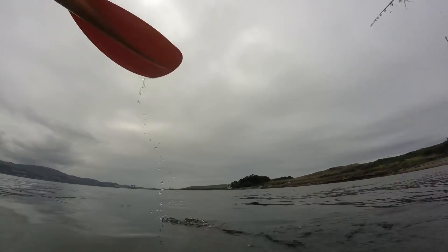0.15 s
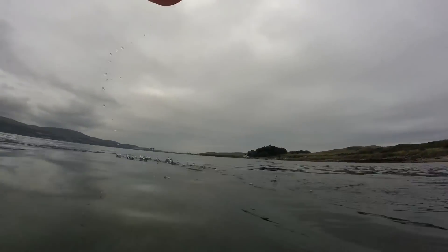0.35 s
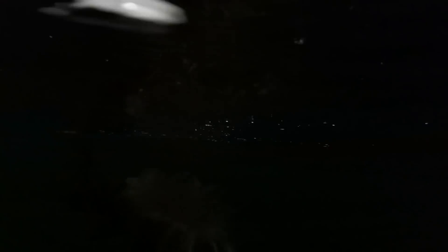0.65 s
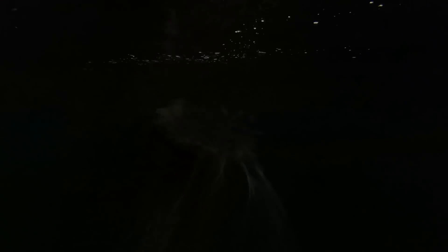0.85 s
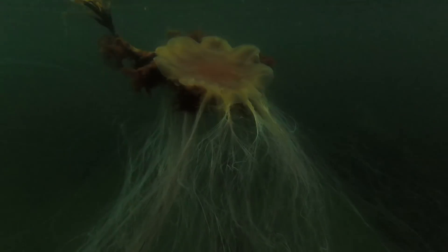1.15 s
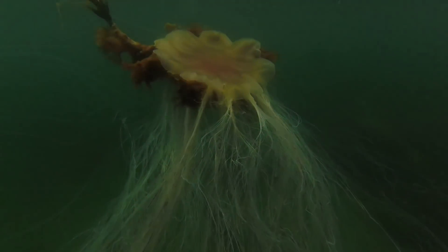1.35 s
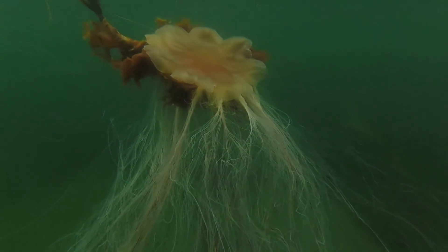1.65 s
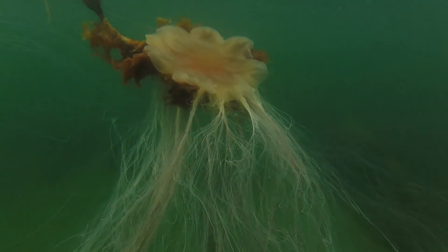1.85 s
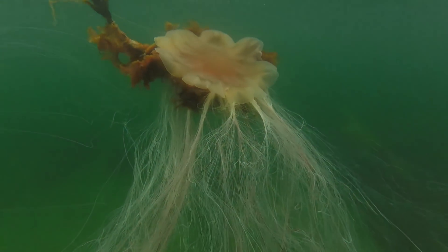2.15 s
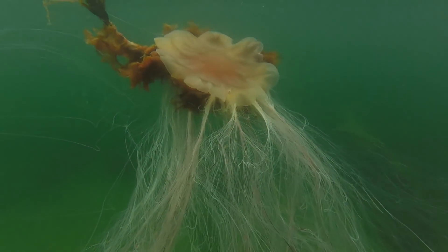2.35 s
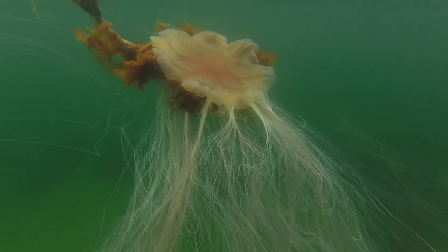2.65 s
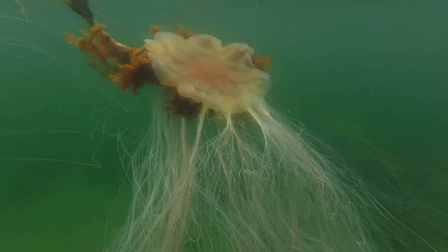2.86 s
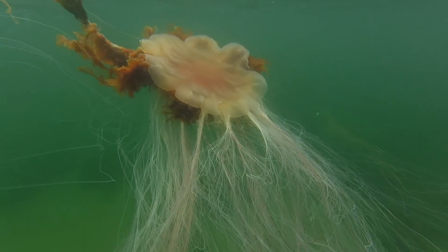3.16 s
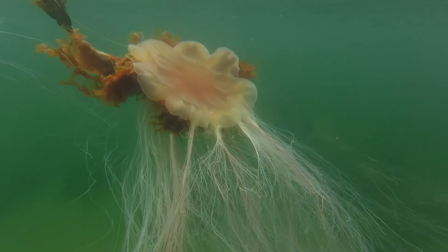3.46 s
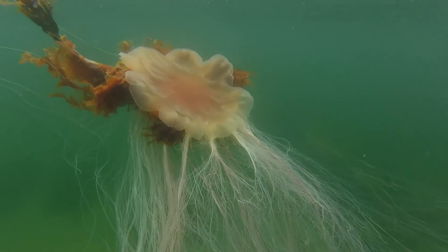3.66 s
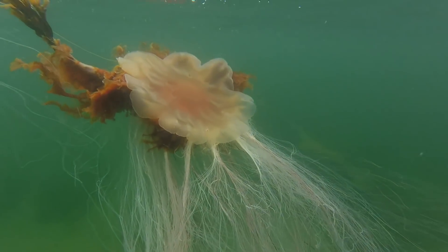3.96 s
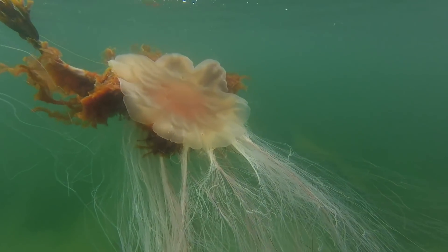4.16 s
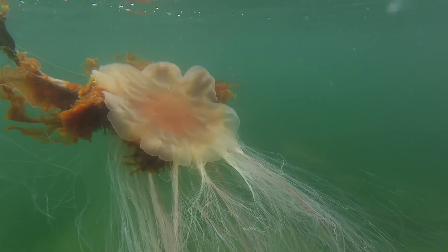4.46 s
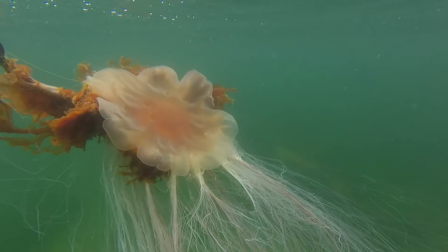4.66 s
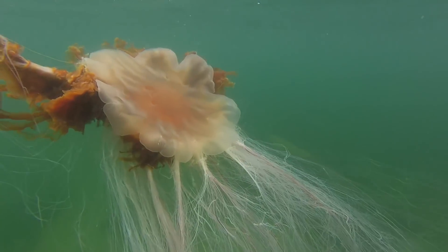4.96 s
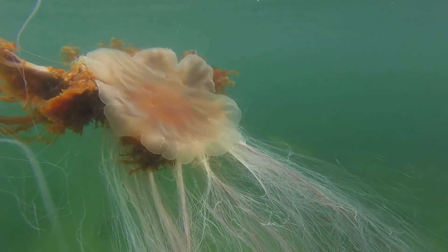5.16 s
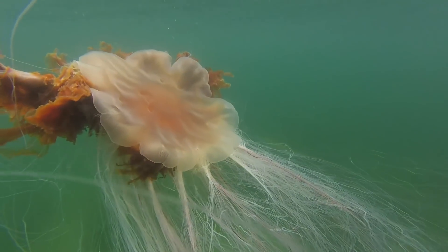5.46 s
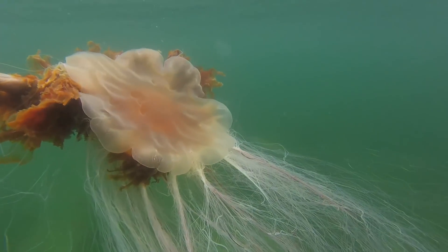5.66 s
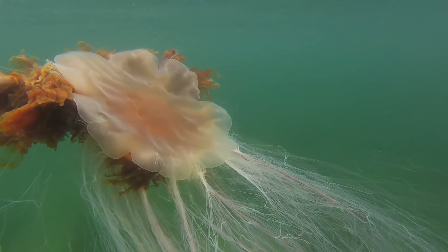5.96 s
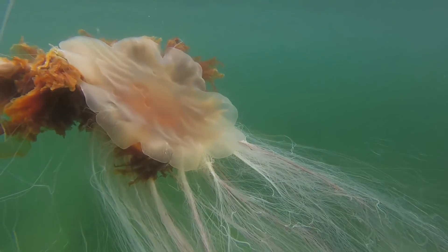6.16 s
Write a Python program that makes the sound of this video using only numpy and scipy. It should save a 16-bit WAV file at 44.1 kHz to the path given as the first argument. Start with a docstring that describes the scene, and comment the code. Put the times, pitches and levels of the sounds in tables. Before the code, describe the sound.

A quick flurry of trickling water, hollow slaps and ringing bubbles, with low wind rumble, surrounds a microphone in a waterproof case as it dips into an estuary. A short surge follows, then the steady underwater sound of a distant boat: a droning engine and a rushing, hissing propeller. The case takes a knock soon after the plunge and a louder one past the middle, with faint ticks and soft low bumps behind.

```python
"""A distant boat's propeller wash and engine, ringing through a small camera's waterproof case.
The case is first lowered from a kayak into an estuary: wind buffets it, water trickles and drips,
then slaps and bubbles ring as it goes under. From there on, cavitation noise and wavering engine
tones fill the water, with a few knocks and faint far snaps.
Loud knocks push the automatic gain down and it creeps back."""
import sys
import numpy as np
from scipy import signal
from scipy.fft import rfft, irfft
from scipy.io import wavfile
from scipy.ndimage import uniform_filter1d

SR = 44100
rng = np.random.default_rng(int(sys.argv[2]) if len(sys.argv) > 2 else 0)


def store_pcm(level_fs):
    """Save levels as 16-bit WAV."""
    pcm = np.round(np.clip(level_fs, -1, 1) * 32767).astype(np.int16)
    wavfile.write(sys.argv[1], SR, np.atleast_2d(pcm).T)


N = 278712
TIME_S = np.arange(N) / SR


def amp(db):
    """dB to gain."""
    return 10 ** (np.asarray(db) / 20)


def unit_rms(x):
    """Scale to rms 1."""
    return x / np.sqrt(np.mean(x ** 2) + 1e-20)


def gain_curve(points):
    """Per-sample gain through (time_s, level_db) points."""
    return amp(np.interp(TIME_S, *np.transpose(points)))


def drift(rate_hz):
    """Smooth random wander, rms 1."""
    hop, warmup = 100, 1000
    pole = np.exp(-2 * np.pi * rate_hz * hop / SR)
    noise = rng.standard_normal(N // hop + warmup + 2)
    slow = signal.lfilter([1], [1, -2 * pole, pole * pole], noise)[warmup:]
    return np.interp(np.arange(N) / hop, np.arange(len(slow)), unit_rms(slow))


def coloured(spectrum):
    """Noise shaped by (freq_hz, density_db) points, rms 1."""
    hz, db = np.transpose(spectrum)
    bins_hz = np.arange(1, N // 2 + 2) * SR / N
    shape = amp(np.interp(np.log(bins_hz), np.log(hz), db))
    return unit_rms(irfft(rfft(rng.standard_normal(N)) * shape, N))


def peak(x, hz, width_hz, gain_db):
    """Lift or cut one resonance."""
    a, w, g = np.pi * width_hz / SR, 2 * np.pi * hz / SR, amp(gain_db / 2)
    return signal.lfilter([1 + a * g, -2 * np.cos(w), 1 - a * g],
                          [1 + a / g, -2 * np.cos(w), 1 - a / g], x)


def butter(order, hz, kind="low"):
    """Butterworth filter sections."""
    return signal.butter(order, hz, kind, fs=SR, output="sos")


def add(out, start_s, sound):
    """Mix in a short sound."""
    at = round(start_s * SR)
    out[at:at + len(sound)] += sound[:N - at]


# far snaps: start_s, level_db
SNAPS = [(.9655, -32.5), (2.1463, -41.5), (3.455, -45.5), (4.997, -36), (5.8635, -43.5)]


def snaps():
    """Faint bright ticks with no ring."""
    out, age = np.zeros(N), np.arange(400) / SR / 0.0017
    band = butter(2, [2600, 7500], "band")
    for start_s, level_db in SNAPS:
        burst = rng.standard_normal(len(age)) * age * np.exp(1 - 2.2 * age)
        add(out, start_s, amp(level_db) * signal.sosfilt(band, burst))
    return out


# wind, then swirl, before the fade: time_s, level_db
BUFFET = [(0, -21), (.07, -35.5), (.66, -33.5), (.82, -24), (.865, -22.5), (.895, -8.5), (.91, -22)]


def buffet():
    """Wind, then stirred water, rumbles on the ports and settles."""
    rumble = coloured([(12, -17.5), (25, 2.5), (60, -7.0), (120, -21), (400, -30), (2000, -84.5)])
    fade = np.clip((1.35 - TIME_S) / 0.52, 0, 1)
    return fade * gain_curve(BUFFET) * rumble


# trickle heard in air: freq_hz, density_db
TRICKLE_SPECTRUM = [(180, -33.5), (300, -13.5), (365, -41.5), (459, -21), (714, -21), (898, -12.5),
                    (1760, -6), (6510, -37), (9500, -41), (13000, -62)]
# dry case resonances: centre_hz, width_hz, gain_db
DRY_RESONANCES = [(870, 89, 5), (1330, 200, 6), (1750, 250, 4.5), (2100, 160, -6), (2450, 270, 8.5),
                  (4200, 300, 1), (6000, 650, 5.5)]
# water passing the dry case: peak_s, rise_s, fall_s, trickle_lift_db, boom_lift_db
SWISHES = [(.085, 0.038, 0.011, 8.5, 4.5), (.29, .06, 0.075, 13.5, 10.5), (.46, 0.085, 0.16, 5.5, 6.5),
           (.86, .1, 0.07, 13, 19.5)]


def surface(trickle_db=-41, boom_db=-35.5, under_s=.9, close_s=.02):
    """Water trickles and the hand makes the dry case boom; both stop as it goes under."""
    swells = [np.clip(np.minimum(1 + (TIME_S - peak_s) / rise_s, 1 - (TIME_S - peak_s) / fall_s), 0, 1)
              for peak_s, rise_s, fall_s, *_ in SWISHES]
    trickle_lift_db, boom_lift_db = np.transpose(SWISHES)[3:] @ swells
    boom = coloured([(60, -34), (140, -2.5), (200, -2.0), (260, -24.5), (2000, -77.5)])
    boom = amp(boom_db + boom_lift_db) * unit_rms(peak(boom, hz=183, width_hz=35, gain_db=8))
    trickle = coloured(TRICKLE_SPECTRUM) * amp(0.95 * drift(60))
    for resonance in DRY_RESONANCES:
        trickle = peak(trickle, *resonance)
    trickle = amp(trickle_db + trickle_lift_db) * unit_rms(trickle)
    in_air = np.clip((under_s - TIME_S) / close_s + .5, 0, 1)
    return in_air * (boom + trickle)


def spatter(from_s=.43, to_s=.81, drops_per_s=260, level_db=-35.5, t60_cycles=14):
    """Tiny random drops around the plunge, each ringing briefly at one of twelve pitches."""
    born = (rng.random(N) < drops_per_s / SR) & (TIME_S > from_s) & (TIME_S < to_s)
    sizes = born * amp(4.5 * np.minimum(rng.exponential(1, N), 4)) * rng.choice([-1, 1], N)
    pitch_index, out = rng.integers(0, 12, N), np.zeros(N)
    for k, pitch_hz in enumerate(np.geomspace(900, 3600, num=12)):
        pole, w = amp(-60 * pitch_hz / (t60_cycles * SR)), 2 * np.pi * pitch_hz / SR
        drops = (sizes * (pitch_index == k))[:SR]
        out[:SR] += signal.lfilter([0, np.sin(w)], [1, -2 * pole * np.cos(w), pole * pole], drops)
    return amp(level_db) * signal.sosfilt(butter(2, 5000), out)


# pressure bumps: start_s, level_db, pitch_hz
BUMPS = [(0.296, -15.5, 31), (.335, -22.5, 90.6), (0.505, -15.5, 300), (0.5967, -8.5, 250),
         (0.698, -17, 202), (0.752, -7, 251), (0.782, -7, 252), (0.862, -0.5, 104), (1.156, -17.5, 252),
         (3.7807, 4, 155), (5.651, -21, 93.6), (5.871, -22, 102), (5.886, -21.5, 97), (5.909, -20.5, 90.5)]


def bumps():
    """Moving water gives soft, heavily damped low swings of pressure."""
    out, t = np.zeros(N), np.arange(6000) / SR
    for start_s, level_db, pitch_hz in BUMPS:
        cycles = pitch_hz * t
        envelope = (1 - np.exp(-9 * cycles)) * np.exp(-1.4 * cycles)
        add(out, start_s, -amp(level_db) * envelope * np.sin(2 * np.pi * cycles))
    return out


# struck case modes: pitch_hz, level_db, t60_s
CASE_MODES = [(632, -14, .035), (1455, -12, .02), (1700, -12, .015), (1943, -5, .02), (2412, -2, .013),
              (2720, -11, .013), (3106, -12, .012), (4050, -12, .008)]


def case_ring(t, spread_db=0.83):
    """The struck case rings in its modes, in a slightly different balance each time."""
    return sum(amp(level_db + rng.normal(0, spread_db) - 60 * t / t60_s) * np.sin(2 * np.pi * hz * t)
               for hz, level_db, t60_s in CASE_MODES)


# slaps, bubbles, knocks: start_s, bubble_db, pitch_hz, t60_s, case_db, crack_db
HITS = [(0.3873, -19, 1700, .011, -28, -18.5), (0.3938, -19, 1830, .017, -33.5, -28),
        (0.4043, 7, 1677, .012, -14, -23.5), (0.4324, -18.5, 2450, .013, -41, -45),
        (0.4683, -18.5, 1440, .013, -29, -34), (0.4913, -12, 2470, .021, -22.5, -11),
        (0.4967, -1, 2510, .019, -5, 0.5), (0.5027, -9, 1430, .027, -25.5, -28),
        (0.5127, -11, 2340, .015, -20, -47), (0.5177, -6, 1610, .0054, -16, -46.5),
        (0.528, -1, 2720, .025, -16, -34), (0.5364, -2, 4024, .024, -17, -25),
        (0.5378, -6.5, 1620, .029, -39, -52), (0.5433, -7, 2930, .014, -14.5, -34.5),
        (0.5473, -22.5, 3890, .01, -21.5, -33), (0.5665, -34, 2030, .012, -36, -31),
        (0.5911, -10, 1600, .013, -13.5, -8.5), (0.597, 11.5, 1766, .011, -6, -25),
        (0.5974, -1, 779, .045, -45, -50.5), (0.6096, -11, 2310, .021, -26.5, -31),
        (0.6251, 5, 2550, .014, -5, -39), (0.6323, -11.5, 940, .024, -23, -32),
        (0.6407, -12, 2690, .015, -21, -13.5), (0.684, -30, 6000, .012, -33.5, -24),
        (0.6884, -11, 6050, .0079, -6, -9), (0.697, -11, 1220, .015, 0.5, -28),
        (0.7015, -7, 2450, .013, -21, -12), (0.713, -23, 1890, .014, -24, -12),
        (0.7453, -11, 2540, .0081, -25, -7.5), (0.7522, 18.5, 2260, .0091, 4, -11.5),
        (0.7588, -0.5, 2180, .013, -19, -41.5), (0.771, -20.5, 710, .013, -30.5, -29),
        (0.7796, 7, 4020, .013, 0, -5.5), (0.7831, 19.5, 2120, .0093, 11, 19.5),
        (0.7973, -8.5, 2440, .013, -22.5, -19.5), (0.8037, -9.5, 2130, .013, -22, -12.5),
        (0.8468, -1, 2390, .013, -2.5, -48), (1.1555, 17.5, 2120, .0043, 12, 4.5),
        (3.7808, 14, 1045, 0.0087, 13, -7.5), (3.7808, 10, 607, .03, -38, -44)]


def hits(last_spray_s=.9, slap_contact_s=.0021, knock_contact_s=.0018, spray_vs_bubble_db=1):
    """A short push rings a bubble and the case, with a crack on top; under water there is no spray."""
    out, t = np.zeros(N), np.arange(4000) / SR
    crack_band, wobble_band = butter(2, [4600, 7800], "band"), butter(4, 500)
    for start_s, bubble_db, pitch_hz, t60_s, case_db, crack_db in HITS:
        wobble_noise, crack_noise, spray_noise = rng.standard_normal((3, len(t)))
        splashing = start_s < last_spray_s
        age = t / (slap_contact_s if splashing else knock_contact_s)
        push = 1.444 * age * np.exp(1 - 1.795 * age)
        depth_db = splashing * 0.0021 * min(pitch_hz, 2500)   # small bubbles wobble most
        wobble_db = depth_db * unit_rms(signal.sosfilt(wobble_band, wobble_noise))
        envelope = (1 - np.exp(-(1.7 * age) ** 2)) * amp(wobble_db - 60 * t / t60_s)
        bubble = envelope / envelope.max() * np.sin(2 * np.pi * pitch_hz * t * (1 + 1.4 * t))
        spray_band = butter(3, [pitch_hz / 1.38, pitch_hz * 1.39], "band")
        spray = splashing * amp(spray_vs_bubble_db) * signal.sosfilt(spray_band, spray_noise * push)
        case = case_ring(t) * (1 - np.exp(-(2.5 * age) ** 2))
        crack = signal.sosfilt(crack_band, crack_noise * push ** 2.07)
        add(out, start_s, amp(bubble_db) * (bubble + spray) + amp(case_db) * case + amp(crack_db) * crack)
    return out


# outline of the weak engine tones: order, level_db
WEAK_ORDERS = [(5, -11), (15, -18), (26, -13), (38, -10), (50, -14), (57, -15)]
# prominent engine tones: order, level_db
STRONG_ORDERS = [(10, -10), (17, -9), (19, -7), (27, -7), (28, -6), (29, -3), (32, -6), (33, -9), (37, -4),
                 (41, -2), (42, 0), (44, -2), (45, -3), (46, -8), (48, -9)]


def engine(cycle_hz=14.152, scatter_db=1.2, waver_db=1.8):
    """Multiples of the steady engine cycle sound as tones, each wavering on its own; rms 1."""
    phase = 2 * np.pi * np.cumsum(cycle_hz * (1 + .0005 * drift(1.5))) / SR
    levels_db = {order: np.interp(order, *np.transpose(WEAK_ORDERS)) + rng.normal(0, scatter_db)
                 for order in range(5, 58)}
    levels_db.update(STRONG_ORDERS)
    tones = sum(amp(db + waver_db * drift(2.4)) * np.sin(order * phase + rng.uniform(0, 2 * np.pi))
                for order, db in levels_db.items())
    return unit_rms(tones)


# propeller wash in water: freq_hz, density_db
WASH_SPECTRUM = [(10, -13), (18, -0.5), (60, -10.5), (190, -20), (260, -16), (600, -9.5), (800, -11.5),
                 (1000, -24), (2600, -22.5), (3300, -45.5), (5000, -47.5), (8000, -51.5), (9000, -55.5),
                 (15000, -64)]
# flooded case resonances: centre_hz, width_hz, gain_db
FLOODED_RESONANCES = [(370, 86, 3.5), (1477, 45, 9.5), (1548, 44, -19), (1530, 50, 4.5), (1707, 42, -14),
                      (1858, 170, 10.5), (1953, 140, 10), (2100, 220, -13), (2384, 110, 6), (2745, 78, -8),
                      (2920, 73, 3), (3670, 600, 7.5)]


def propeller(shift_share=.03, shift_lift_db=3, crossfade_s=(3, 6)):
    """Cavitation noise through the case: lumpy bass, swelling resonances, steady hiss; rms 1."""
    early = late = coloured(WASH_SPECTRUM)
    for hz, width_hz, gain_db in FLOODED_RESONANCES:
        early = peak(early, hz, width_hz, gain_db)
        shifts = 1900 < hz < 2600   # these end a little higher and louder
        late = peak(late, hz * (1 + shift_share * shifts), width_hz, gain_db + shift_lift_db * shifts)
    wash = early + (late - early) * np.interp(TIME_S, crossfade_s, [0, 1])
    bass, below_ring, below_hiss = (signal.sosfiltfilt(butter(4, hz), wash) for hz in (150, 1100, 3100))
    lumps = bass * amp(2.6 * drift(6.3))
    mids = below_ring - bass
    ring = (below_hiss - below_ring) * amp(1.78 * drift(5.4))
    hiss = wash - below_hiss
    return unit_rms(lumps + mids + ring + hiss)


# underwater sound as the case floods: time_s, gain_db
FLOODING = [(.8, -35), (.835, 11), (.87, 13.5), (.895, 12), (.905, -4.5), (1.0, -2.5)]


def boat():
    """Engine and propeller carry through the water, surging in as the case goes under."""
    return gain_curve(FLOODING) * (amp(-37) * engine() + amp(-35.5) * propeller())


def scene():
    """All sources at one microphone."""
    return (boat() + buffet() + surface() + hits() + snaps() + spatter() + bumps())[None]


def record(dry, limit_db=-0.15, release_db_per_s=19, cutoff_hz=16400):
    """Gain ducks just ahead of a loud peak and recovers steadily; faint circuit hiss; the top is cut."""
    creep_db = release_db_per_s * TIME_S
    level_db = 20 * np.log10(np.abs(dry[0]) + 1e-9)
    held_db = np.maximum.accumulate(level_db + creep_db) - creep_db
    cut_db = np.maximum(held_db - limit_db, 0)
    for _ in range(2):   # look-ahead smoothing
        cut_db = uniform_filter1d(cut_db, size=24, origin=-12)
    limited = np.clip(dry * amp(-cut_db), -1, 1)
    hiss = amp(-87) * coloured([(100, -3.0), (8000, -8), (14000, -18.0)])
    return signal.sosfilt(signal.cheby2(12, 70, cutoff_hz, fs=SR, output="sos"), limited + hiss)


dry = scene()
out = record(dry)
store_pcm(out)
```